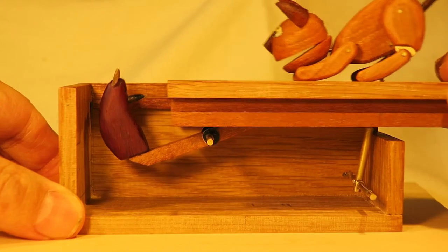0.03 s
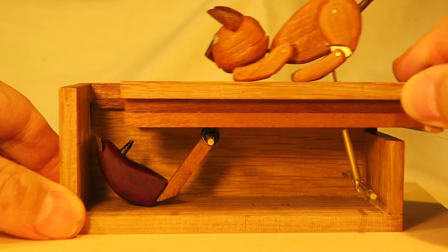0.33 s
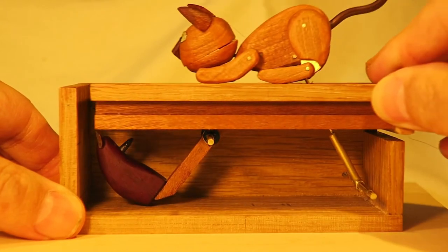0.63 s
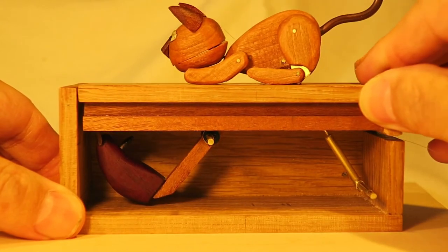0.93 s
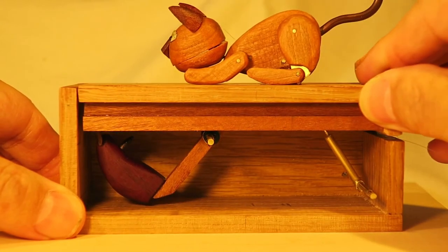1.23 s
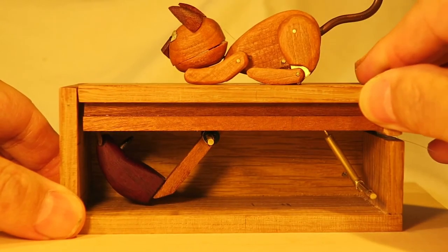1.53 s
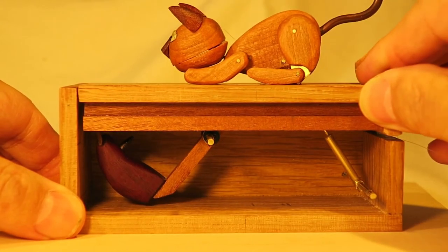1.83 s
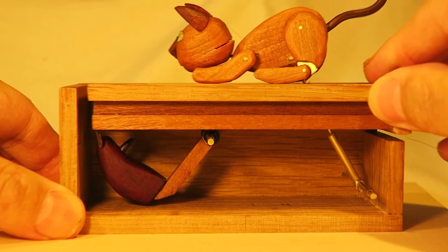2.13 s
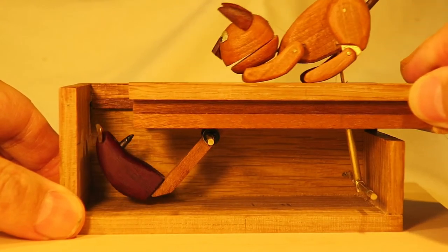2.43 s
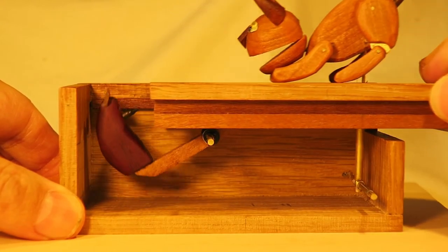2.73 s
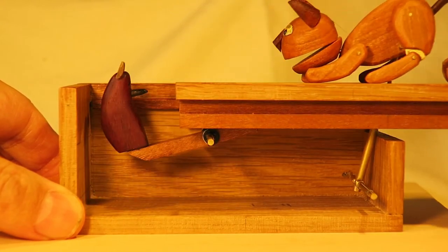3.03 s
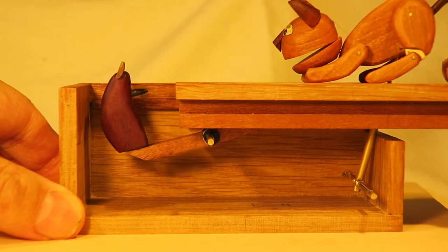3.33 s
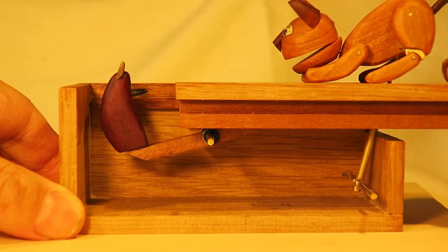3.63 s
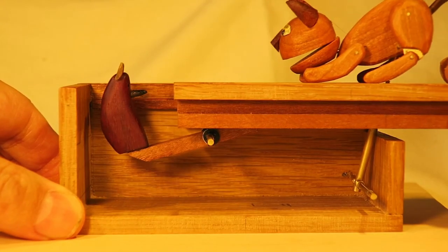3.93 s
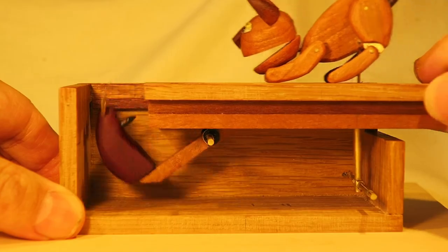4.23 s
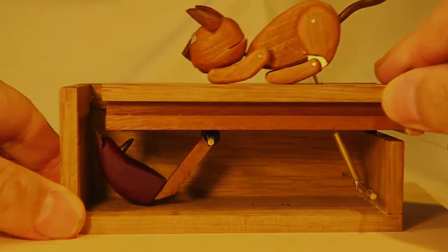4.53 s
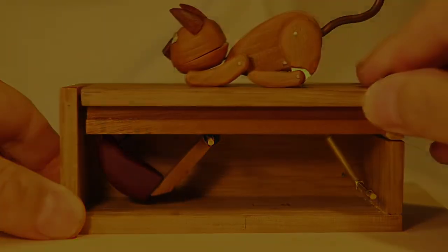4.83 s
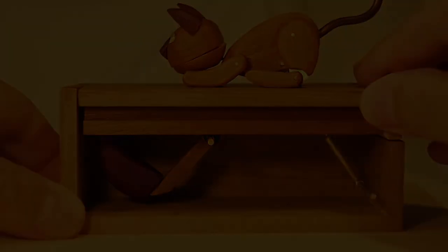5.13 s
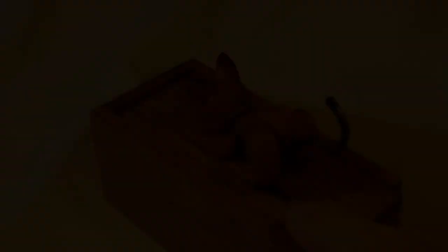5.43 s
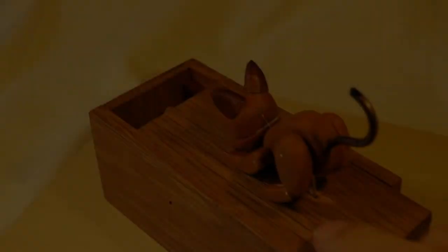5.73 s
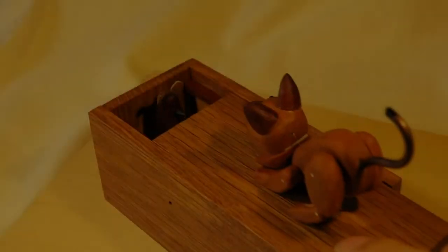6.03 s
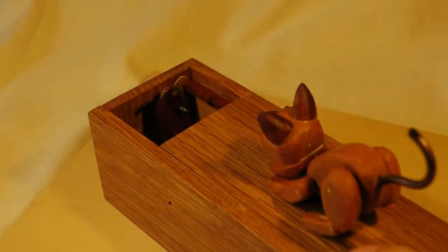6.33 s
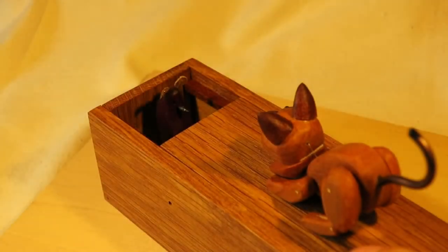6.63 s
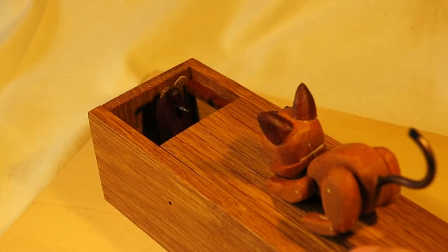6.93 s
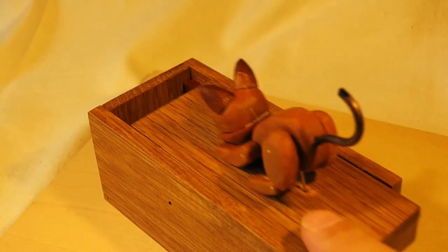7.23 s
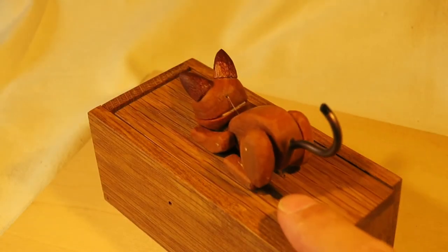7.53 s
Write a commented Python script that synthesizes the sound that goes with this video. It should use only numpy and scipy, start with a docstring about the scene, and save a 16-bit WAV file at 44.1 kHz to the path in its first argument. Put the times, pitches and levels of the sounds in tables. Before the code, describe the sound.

Wood rubs on wood as a toy box lid is pushed shut and open, knocking lightly and ending with a groan.

```python
"""In a quiet room, a hand slides the lid of a small wooden toy box shut and open, close by.
Stick-slip friction in the grooves excites the wood and the air cavity: the lid scrapes, squeaks
and groans, and the box answers hollowly. Inside, a wooden figure knocks and its wire linkage ticks,
each impact decaying in damped modes. The sound fades out and in before a last, groaning push."""
import sys
import numpy as np
from scipy import signal
from scipy.fft import rfft, irfft
from scipy.io import wavfile

SR = 44100
rng = np.random.default_rng(int(sys.argv[2]) if len(sys.argv) > 2 else 0)


def file_out(sig):
    """Save sig as 16-bit WAV at sys.argv[1]."""
    # one column per channel
    cols = np.atleast_2d(sig).T
    # limit, then scale
    lim = np.clip(cols, -1, 1)
    pcm = np.round(lim * 32767).astype(np.int16)
    wavfile.write(sys.argv[1], SR, pcm)


N = 338247
TIME = np.arange(N) / SR

# strokes of the lid: start t/s, fastest t/s, end t/s, scrape level/dB, hollow rub level/dB,
# shudder level/dB, hiss level/dB, cavity f/Hz at full speed, ringing level/dB
STROKES = [(0, 0.172, 0.36, -58.5, -71, -68, -80.5, 355, -65),
           (0.15, 0.355, 0.69, -56.5, -56.5, -57, -80, 355, -60),
           (0.425, 0.635, 0.9, -56, -44, -54, -72, 352, -61),
           (0.62, 0.834, 0.94, -58.5, -51, -64, -88, 345, -60.5),
           (2.05, 2.293, 2.51, -56, -50, -54, -76, 360, -55),
           (2.33, 2.42, 2.62, -59.5, -62, -67, -83, 360, -60),
           (2.55, 2.723, 2.9, -60, -68, -72, -96, 360, -62),
           (2.78, 2.971, 3.17, -60, -65, -73, -95, 360, -63.5),
           (3.929, 4.445, 4.875, -56, -61.5, -58, -80.5, 365, -61),
           (5.975, 6.267, 6.43, -59.5, -49.5, -56.5, -83, 365, -81),
           (6.279, 6.405, 6.56, -66, -48.5, -55.5, -85, 375, -70),
           (7.042, 7.296, 7.52, -69, -53, -50, -74.5, 332, -77),
           (7.29, 7.645, 7.87, -70.5, -49.5, -57, -82.5, 287.4, -71)]
# fingers shifting their grip: start t/s, firmest t/s, end t/s, hollow rub level/dB, shudder level/dB
GRIPS = [(.68, .93, 1.315, -49.5, -70), (1.33, 1.88, 2.48, -53.5, -77), (4.43, 4.67, 5.08, -53, -55.5),
         (5.39, 5.66, 6.1, -70.5, -56.5), (5.94, 6.16, 6.7, -52, -72), (6.54, 6.64, 6.2, -57, -70)]
# each layer's amplitude grows as this power of the speed
SCRAPE_POWER, HOLLOW_POWER, SHUDDER_POWER, HISS_POWER = 1.39, 1.23, 1.85, 2.6


def sliding(hollow_db=-0.33, scrape_db=-1.27, judder_db=3.0, cavity_db=1.5, rest_hz=337, width_hz=110):
    """Friction excitation: slips of lid and fingers drive the wood and the air cavity of the box."""
    # spectra of the hollow rub and of the scrape: f/Hz, level/dB
    hollow_spectrum = [(30, -14), (65, -6), (130, -12), (220, -10.5), (290, -5), (345, 0), (440, -0.5),
                       (520, -10.5), (600, -14.5), (720, -11), (880, -27), (2000, -43), (8000, -58.5)]
    scrape_spectrum = [(60, -11), (130, -1.5), (300, -16.5), (600, -9.5), (820, -4.5), (1030, -1.5),
                       (1500, -5.5), (2000, -17), (2900, -18), (4200, -24), (7000, -30.5), (14000, -39.5)]
    # the cavity resonance leaves its rest pitch as the lid gains speed
    cavity_hz = rest_hz + sum((hz - rest_hz) * arch(start, top, end)
                              for start, top, end, *_, hz, ringing_db in STROKES)
    cavity = resonate(slips(per_s=3400, spread_db=1.5), cavity_hz, width_hz)
    body = colour(slips(per_s=3000, spread_db=1.0), hollow_spectrum, band=(270, 520))
    hollow = (body + amp(cavity_db) * cavity) / np.hypot(1, amp(cavity_db))
    scrape = colour(slips(per_s=2200, spread_db=1.4), scrape_spectrum, band=(1100, 1900))
    scrape *= amp(judder_db * wander(25))  # the hand is unsteady
    hollow_gain = np.hypot(swells(STROKES, HOLLOW_POWER, column=4), swells(GRIPS, HOLLOW_POWER, column=3))
    scrape_gain = swells(STROKES, SCRAPE_POWER, column=3)
    return amp(hollow_db) * hollow_gain * hollow + amp(scrape_db) * scrape_gain * scrape


def ringing_rub(db=-1, judder_db=2):
    """Repeated excitation: the coarser catches of the sliding lid sustain a pitched ringing."""
    catches = slips(per_s=1400, spread_db=2.0) * amp(judder_db * wander(25))
    return amp(db) * swells(STROKES, SCRAPE_POWER, column=8) * unit(ringing(catches))


def ringing(x):
    """Convolution: colours a sound with a set of ringing pitches, with gain 1 at the strongest."""
    # ringing pitches that colour the knocks and scrapes of the box: f/Hz, level/dB, T60/s
    ringing_pitches = [(590, -15.5, .09), (690, -11.5, 0.13), (827, -12.5, 0.09), (958, -4.5, 0.067),
                       (1027, 0, 0.081), (1090, -1.5, 0.065), (1171, -4, 0.14), (1294, -7.5, 0.0349),
                       (1420, -9, .04), (1496, -4.5, 0.075), (1680, -6, 0.045), (2090, -13.5, .05),
                       (2293, -16, .06), (2940, -8, .03)]
    response = ring(ringing_pitches)
    return signal.fftconvolve(x, response / abs(rfft(response)).max())[:len(x)]


def groan(db=-1, waver=0.018, swell_power=0.58):
    """Stick-slip: the binding lid drives a narrow gliding resonance and faint steady upper ones."""
    # the lid binding: start t/s, loudest t/s, end t/s, first f/Hz, last f/Hz, bandwidth/Hz, level/dB
    bindings = [(0.412, 0.45, 0.48, 2000, 1630, 400, -55), (4.413, 4.55, 4.7, 1790, 1707, 306, -60.5),
                (5.472, 5.58, 6.07, 757, 900, 220, -58), (6.091, 6.37, 6.48, 692, 700, 170, -55),
                (7.057, 7.153, 7.4, 988, 1010, 170, -51.5), (7.142, 7.165, 7.1, 833, 730, 80, -56),
                (7.143, 7.282, 7.38, 910, 800, 125, -44.5), (7.329, 7.366, 7.44, 685, 823, 90, -53.5),
                (7.41, 7.475, 7.4, 694, 630, 100, -60), (7.423, 7.519, 7.72, 2550, 2550, 354, -68)]
    # upper resonances of the lid: f/Hz, bandwidth/Hz, level/dB
    upper_modes = [(1710, 200, -24), (3260, 900, -21), (5900, 800, -25)]
    drive = slips(per_s=2000, spread_db=0.0)
    rasp = sum(amp(mode_db) * resonate(drive, hz, width_hz) for hz, width_hz, mode_db in upper_modes)
    bend = 1 + waver * wander(25)
    out = np.zeros(N)
    for start, top, end, first_hz, last_hz, width_hz, peak_db in bindings:
        tone = resonate(drive, glide(start, end, first_hz, last_hz) * bend, width_hz)
        out += amp(db + peak_db) * arch(start, top, end) ** swell_power * (tone + rasp)
    return out


def knocks(low_hz=520, crack_db=-16, crack_s=0.0067, ringing_db=-5.0):
    """Impact excitation: a blow rings the struck piece and shakes the box; soft contacts lose treble."""
    # wooden impacts: t/s, level/dB, contact cutoff f/Hz, pitch factor, ring time factor, thud level/dB
    impacts = [(0.134, -41.5, 1902, 1.53, 0.91, -56), (0.399, -14.5, 2610, 1.07, 0.81, -31.5),
               (0.41, -25.5, 1840, 0.75, 1.03, -35.5), (0.448, -37, 1500, 0.89, 0.47, -45),
               (0.6553, -39, 1770, 1.05, 1, -50), (0.8121, -43, 1800, 0.99, 1.35, -57),
               (0.8711, -27.5, 1830, 1.4, 0.45, -46), (0.8777, -39, 1511, 0.87, 1, -36),
               (2.4116, -33, 1720, 0.9, 1.1, -42), (2.452, -40.5, 2020, 1.2, 0.71, -46),
               (2.958, -49, 2490, 1.12, 1, -65), (4.4541, -32, 2300, 0.78, 1.1, -38),
               (4.5232, -46, 2000, 1.6, 1.1, -41), (4.964, -26, 1147, 1.06, 0.75, -35),
               (5.19, -31, 1120, 0.98, 0.87, -44), (7.1318, -44, 1100, 0.96, 2.2, -69),
               (7.2729, -36.5, 5000, 1.9, 0.8, -45), (7.2742, -29, 1000, 0.87, 2.3, -34),
               (7.2866, -47, 5500, 3.2, 1.3, -51), (7.2925, -30, 2020, 0.95, 2.6, -54),
               (7.3265, -34.5, 1400, 0.81, 1.7, -46)]
    # modes of the struck wood and of the whole box on the table: f/Hz, level/dB, T60/s
    wood_modes = [(490, -24, 0.011), (696, -25.5, 0.023), (982, 1.5, 0.014), (1560, -5, 0.0064),
                  (2100, -20, 0.013), (2640, -9.5, 0.005)]
    box_modes = [(128, -1, 0.22), (236, -0.5, 0.065), (335, 0, 0.18), (480, -3, 0.11), (595, -1, 0.036)]
    out, t = np.zeros(N), TIME[:SR // 4]
    low_cut = signal.butter(2, low_hz, "highpass", fs=SR, output="sos")
    for start, db, cutoff_hz, pitch, length, thud_db in impacts:
        crack = amp(crack_db) * rng.standard_normal(len(t)) * np.exp(-t / crack_s)
        contact = np.vstack([low_cut, signal.butter(4, cutoff_hz, fs=SR, output="sos")])
        blow = peaked(signal.sosfilt(contact, ring(wood_modes, pitch, length) + crack), db)
        thud = peaked(ring(box_modes), thud_db)
        add(out, start, blow + amp(ringing_db) * ringing(blow) + thud)
    return out


def shudder(db=-1.4, hz=142, width_hz=64):
    """Structure-borne sound: the pushed box drives a low resonance of the table top."""
    push = np.hypot(swells(STROKES, SHUDDER_POWER, column=5), swells(GRIPS, SHUDDER_POWER, column=4))
    return amp(db) * push * resonate(slips(per_s=2800, spread_db=4.5), hz, width_hz)


def ticks(chatter=0.063, chatter_s=0.00099):
    """Contact chatter: the wire rattles for an instant against its hole, then vibrates freely."""
    # ticks of the linkage: t/s, level/dB
    impacts = [(0.401, -44.5), (7.274, -32.5)]
    # modes of the wire: f/Hz, level/dB, T60/s
    wire_modes = [(4520, -1.5, 0.013), (5600, -9.5, 0.003), (6430, -4, 0.0076), (9900, -21, 0.0071),
                  (13080, -23, 0.0067)]
    out, t = np.zeros(N), TIME[:SR // 100]
    for start, db in impacts:
        contact = chatter * rng.standard_normal(len(t)) * np.exp(-t / chatter_s)
        contact[0] = 1
        add(out, start, peaked(signal.fftconvolve(ring(wire_modes), contact), db))
    return out


def grain_hiss(db=-1, judder_db=2.5):
    """Roughness noise: at speed, slips over the wood grain merge into a hiss."""
    # spectrum of the hiss: f/Hz, level/dB
    grain_spectrum = [(1500, -12.5), (3300, 2), (4500, 0), (6500, 1.5), (9000, -1.5), (10400, 2),
                      (11500, 0.5), (13200, -3.5), (15000, -13.5)]
    grain = colour(rng.standard_normal(N), grain_spectrum, band=(9000, 11500))
    return amp(db + judder_db * wander(40)) * swells(STROKES, HISS_POWER, column=6) * grain


def squeaks(db=-1, width_hz=230, swell_power=2.66):
    """Stick-slip: friction drives narrow, very high resonances into thin whistles."""
    # squeaks of the lid: start t/s, loudest t/s, end t/s, first f/Hz, last f/Hz, level/dB
    whistles = [(2.08, 2.138, 2.37, 10300, 11840, -76), (2.151, 2.318, 2.43, 13100, 14200, -74),
                (2.2, 2.26, 2.36, 10300, 10550, -73), (2.318, 2.33, 2.42, 13030, 10600, -64)]
    friction = rng.standard_normal(N)
    out = np.zeros(N)
    for start, top, end, first_hz, last_hz, peak_db in whistles:
        tone = resonate(friction, glide(start, end, first_hz, last_hz), width_hz)
        out += amp(db + peak_db) * arch(start, top, end) ** swell_power * tone
    return out


def room(x, tail_db=-9.0, t60=0.076, spread=.4, right_db=0.47):
    """Reverberation: direct sound from slightly right, early reflections and a short diffuse tail."""
    # reflections from the table and walls: delay t/s, gain
    reflections = [(.0074, .07), (.00843, .12), (.00912, .12), (.011, .16), (.0126, .08), (.0146, .12),
                   (0.021, 0.1)]
    t = TIME[:SR // 3]
    early = np.zeros(len(t))
    early[0] = 1
    for delay, gain in reflections:
        early[round(delay * SR)] += gain
    tails = rng.standard_normal((2, len(t))) * amp(-60 * t / t60) * (1 - np.exp(-t / .003))
    mid, side = amp(tail_db) * tails / np.linalg.norm(tails[0])
    left = np.roll(early + mid, 2) + spread * side  # arrives two samples later
    right = early + mid - spread * side
    balance = amp([[-right_db], [right_db]])
    return signal.fftconvolve(x[None], np.array([left, right]), axes=1)[:, :N] * balance


def background(mid_db=-53.5, side_db=-57):
    """Ambient noise: room rumble, hum and hiss, widened by a part in antiphase between the channels."""
    # spectra of the in-phase and antiphase noise: f/Hz, level/dB
    mid_spectrum = [(15, -15), (25, -4), (43, -1), (150, -12.5), (232, -11.5), (306, -11), (450, -14.5),
                    (593, -20), (897, -21.5), (1180, -23), (3000, -30), (6520, -37), (9330, -43),
                    (12000, -52), (14500, -58)]
    side_spectrum = [(30, -19), (60, -21), (130, -8.5), (250, -6), (420, -6), (560, -9), (1200, -11.5),
                     (1600, -12.5), (3000, -16), (6000, -22.5), (10000, -29.5), (14500, -37)]
    mid = amp(mid_db) * colour(rng.standard_normal(N), mid_spectrum)
    side = amp(side_db) * colour(rng.standard_normal(N), side_spectrum)
    return mid + hum() + np.array([side, -side])


def hum(edge_s=0.046):
    """Pure tones: a low, soft-edged hum, with one pitch on each side of the fade."""
    # hums: start t/s, end t/s, f/Hz, first level/dB, last level/dB
    tones = [(5.026, 5.358, 75, -58.5, -58.5), (5.422, 7.672, 58.4, -58.5, -66.5)]
    out = np.zeros(N)
    for start, end, hz, first_db, last_db in tones:
        gate = np.clip(np.minimum(TIME - start, end - TIME) / edge_s + 1, 0, 1)
        rms = amp(np.interp(TIME, [start, end], [first_db, last_db]))
        out += gate * rms * np.sqrt(2) * np.sin(2 * np.pi * hz * TIME)
    return out


def slips(per_s, spread_db):
    """Poisson process: tiny slips of wood on wood, their sizes scattered more as spread_db grows."""
    size = amp(spread_db * np.minimum(rng.exponential(1, N), 4))
    return size * rng.standard_normal(N) * (rng.random(N) < per_s / SR)


def ring(modes, pitch=1, length=1):
    """Exponential decay: a sum of damped sines, neighbours in opposite phase."""
    t = TIME[:SR // 4]
    return sum((-1) ** k * amp(db - 60 * t / (t60 * length)) * np.sin(2 * np.pi * hz * pitch * t)
               for k, (hz, db, t60) in enumerate(modes))


def resonate(x, hz, width_hz):
    """Resonance: passes a band of x around a steady or moving frequency; rms 1."""
    carrier = np.exp(2j * np.pi * np.cumsum(hz * np.ones(N)) / SR)
    baseband = signal.lfilter(*signal.butter(2, width_hz / 2, fs=SR), x / carrier)
    return unit((carrier * baseband).real)


def colour(x, points, band=None):
    """Spectral shaping: filters x to rms 1, overall or within a band in Hz."""
    hz = np.fft.rfftfreq(N, 1 / SR)
    point_hz, point_db = np.transpose(points)
    spectrum = rfft(x) * amp(np.interp(np.log(hz + 1), np.log(point_hz), point_db))
    inside = 1 if band is None else (hz > band[0]) & (hz < band[1])
    return irfft(spectrum, N) / np.std(irfft(spectrum * inside, N))


def wander(rate_hz):
    """Random fluctuation: low-passed noise of rms 1."""
    hz = np.fft.rfftfreq(N, 1 / SR)
    return unit(irfft(rfft(rng.standard_normal(N)) * np.exp(-(hz / rate_hz) ** 2), N))


def arch(start, top, end):
    """Speed of a movement: from rest to 1 at the top and back; zero if end precedes start."""
    return np.sin(np.pi / 2 * np.interp(TIME, [start, top, end], [0, 1, 0]))


def swells(rows, power, column):
    """Incoherent sum: the gain of movements that each peak at the level in the given column."""
    return np.sqrt(sum((amp(row[column]) * arch(*row[:3]) ** power) ** 2 for row in rows))


def glide(start, end, first_hz, last_hz):
    """Linear frequency sweep over one event."""
    return np.interp(TIME, [start, end], [first_hz, last_hz])


def add(mix, start, sound):
    """Superposition: mixes a sound in at a start time in seconds."""
    part = mix[round(start * SR):][:len(sound)]
    part += sound[:len(part)]


def amp(db):
    """Level to amplitude ratio."""
    return 10 ** (np.asarray(db) / 20)


def unit(x):
    """Normalises to rms 1."""
    return x / np.sqrt(np.mean(x ** 2) + 1e-20)


def peaked(x, db):
    """Normalises to a peak level."""
    return amp(db) * x / abs(x).max()


def scene():
    """Directivity: the box radiates into the room; thin, high sounds beam straight at the listener."""
    box = sliding() + ringing_rub() + groan() + shudder() + knocks()
    return room(box) + grain_hiss() + squeaks() + ticks() + background()


def record(dry, cutoff_hz=15000):
    """Attenuation and band limiting: the sound fades out and in, and loses its highest treble."""
    # the fade: t/s, gain
    fade = [(4.47, 0.87), (5.39, 0.0024), (5.6, 0.074), (6, 0.3), (6.6, 0.91)]
    faded = dry * np.interp(TIME, *np.transpose(fade))
    low_pass = signal.firwin(1023, cutoff_hz, window=("kaiser", 9), fs=SR)
    return signal.oaconvolve(faded, low_pass[None], "same")


dry = scene()
out = record(dry)
file_out(out)
```